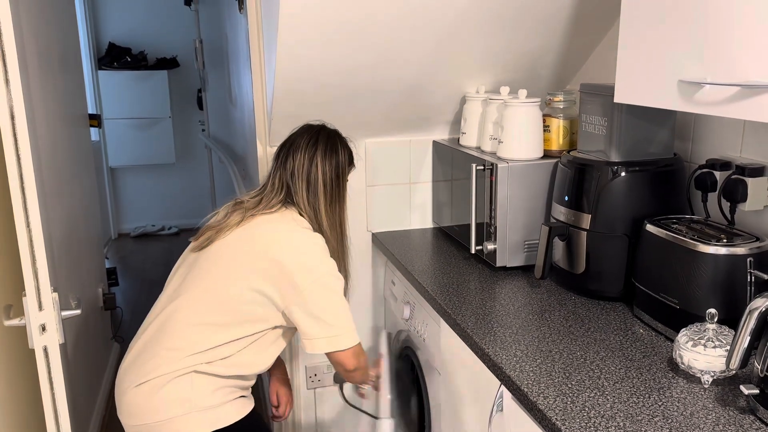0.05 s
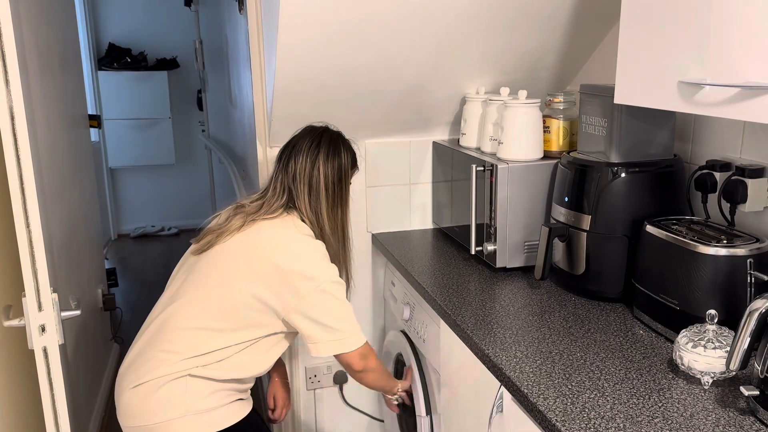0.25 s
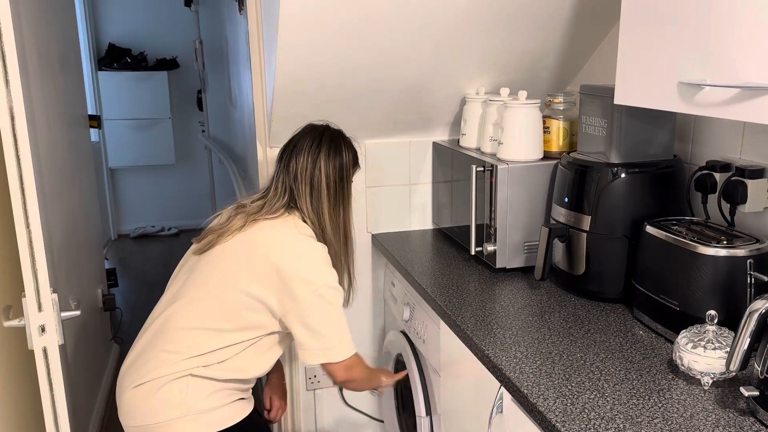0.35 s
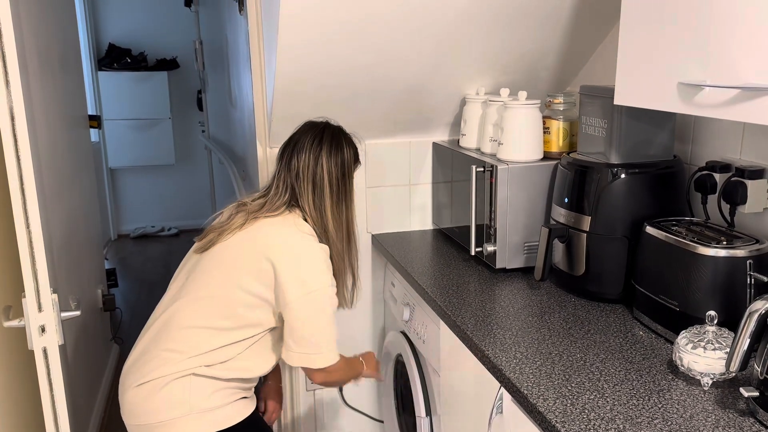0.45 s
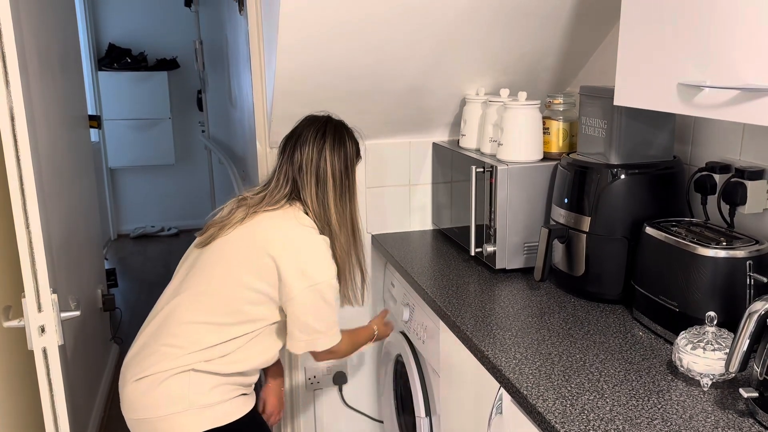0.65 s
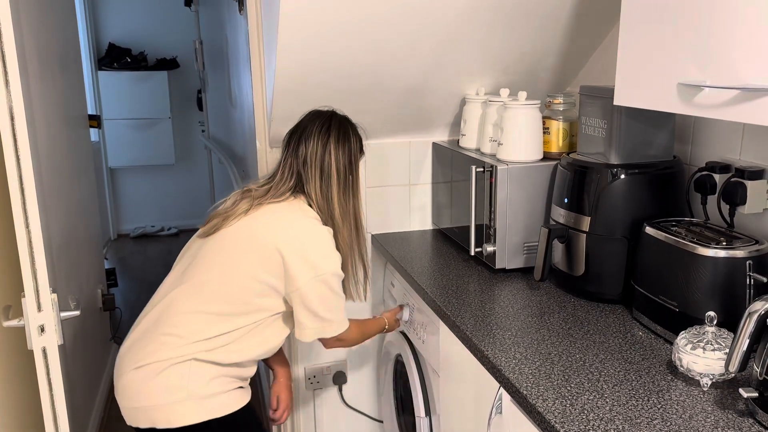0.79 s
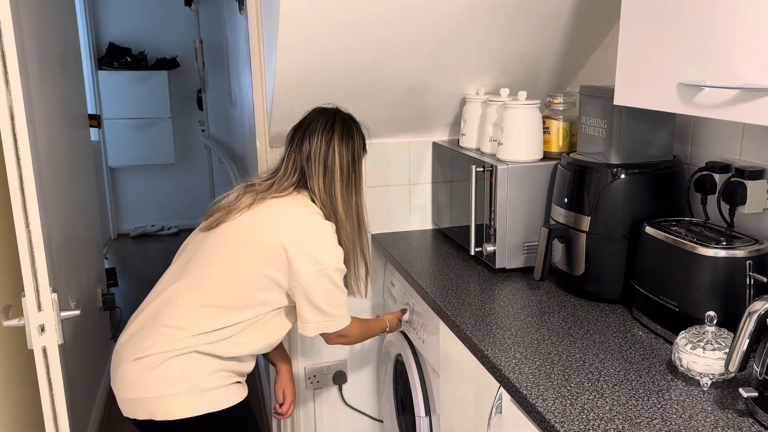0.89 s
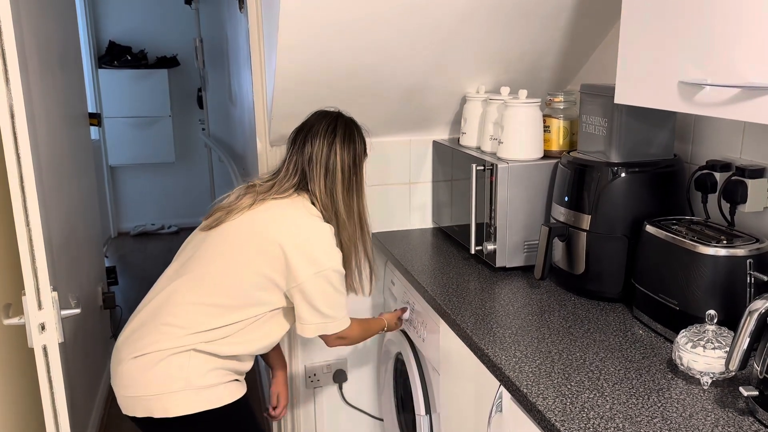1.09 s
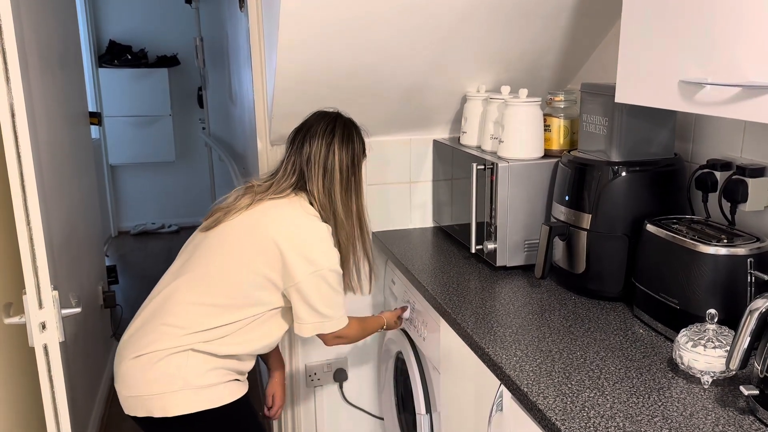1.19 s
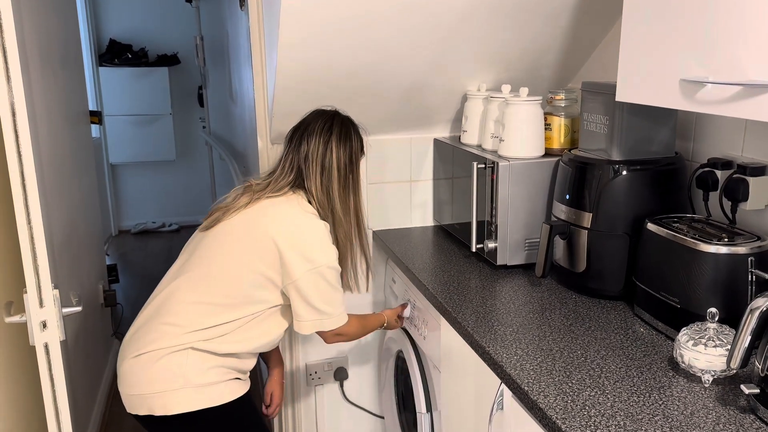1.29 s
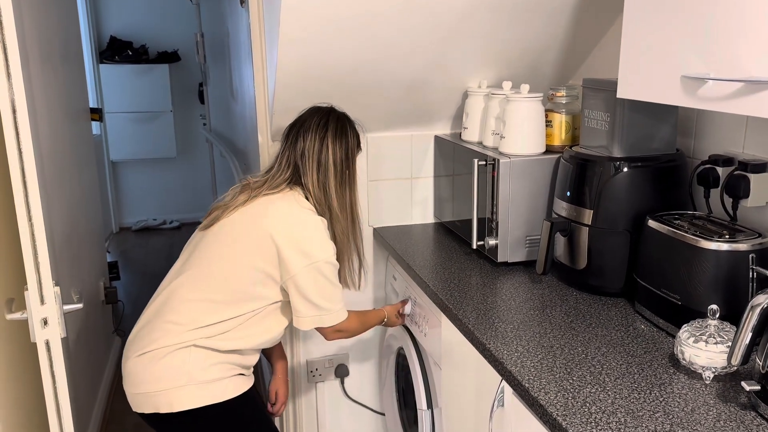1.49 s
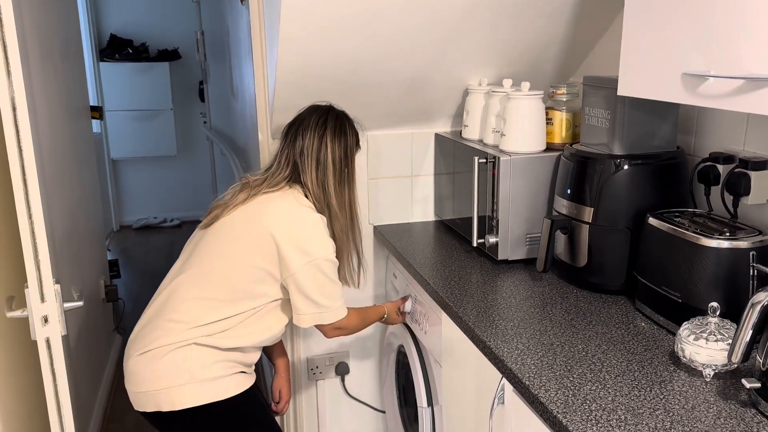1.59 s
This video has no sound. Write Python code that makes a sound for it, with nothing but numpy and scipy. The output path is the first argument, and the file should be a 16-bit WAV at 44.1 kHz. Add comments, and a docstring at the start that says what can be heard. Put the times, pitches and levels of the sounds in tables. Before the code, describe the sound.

A washing machine door slams shut with a loud hollow thud and sharp metallic latch click

```python
"""Washing machine door shut in a small kitchen

A two-port microphone hears a faint rattle, the hook sliding in, the door striking its frame and the latch snapping.
Strikes and snaps are coloured noise bursts; door, latch and panels add decaying sine modes.
The cabinet booms and the sprung drum rocks in low swelling tones while a diffuse noise tail makes the hard room.
Afterwards clothes rustle and a few soft bumps sound, over hiss, low rumble and a very faint ticking."""
import sys
import numpy as np
from scipy import signal
from scipy.fft import rfft, irfft, next_fast_len
from scipy.io import wavfile
from scipy.ndimage import uniform_filter1d

SR = 44100
rng = np.random.default_rng(int(sys.argv[2]) if len(sys.argv) > 2 else 0)


def file_out(sig):
    """Save sig as 16-bit WAV at sys.argv[1]."""
    # one column per channel
    cols = np.atleast_2d(sig).T
    # limit, then scale
    lim = np.clip(cols, -1, 1)
    pcm = np.round(lim * 32767).astype(np.int16)
    wavfile.write(sys.argv[1], SR, pcm)


N = 72765  # length in samples


def amp(db):
    """Decibels to linear gain."""
    return 10 ** (np.asarray(db) / 20)


def unit(x):
    """Scaled to rms 1."""
    return x / np.sqrt(np.mean(x ** 2) + 1e-20)


def along(points, hz):
    """A curve of (frequency_hz, value) points, read on a log frequency axis."""
    point_hz, value = np.transpose(points)
    return np.interp(np.log(hz + 1), np.log(point_hz + 1), value)


def since(start_s):
    """Seconds since start_s, zero before it."""
    return np.maximum(np.arange(N) / SR - start_s, 0)


def fade(t, t60):
    """Exponential decay, 60 dB down after t60 seconds."""
    return np.exp(-np.log(1000) * t / t60)


def envelope(start_s, rise, t60):
    """An exponential rise (time constant in s) at start_s, under an exponential decay."""
    t = since(start_s)
    return (1 - np.exp(-t / rise)) * fade(t, t60)


def sine(pitch_hz, t):
    """A sine of one pitch over the times t."""
    return np.sin(2 * np.pi * pitch_hz * t)


def filtered(x, response):
    """Sound whose spectrum is multiplied by a response of frequency, with padding against wrap-around."""
    size = next_fast_len(N + SR // 4)
    hz = np.fft.rfftfreq(size, 1 / SR)
    return irfft(rfft(x, size) * response(hz), size)[..., :N]


def noise(colour, alike):
    """Coloured stereo noise of rms 1, its left-right likeness set by the share of mid and side."""
    def mid_side(hz):
        angle = np.arccos(np.clip(along(alike, hz), -1, 1)) / 2
        return amp(along(colour, hz)) * np.array([np.cos(angle), np.sin(angle)])

    mid, side = filtered(rng.standard_normal((2, N)), mid_side)
    return unit(np.array([mid + side, mid - side]))


# low room noise over time: start_s, level_db (relative)
RUMBLE_LEVEL = [(0, 1), (0.079, -4), (.13, 2.5), (.5, 1.5), (1.0, 3.5), (1.25, -1), (1.471, 1),
                (1.53, -7.5), (1.65, 0)]
# spectrum of the low room noise: frequency_hz, density_db (relative, per Hz)
RUMBLE_COLOUR = [(20, 0), (60, 4), (110, 1.5), (230, -8), (330, -12), (430, -15.5), (580, -19), (720, -28),
                 (1200, -45), (4000, -47)]
# spectrum of the hiss: frequency_hz, density_db (relative, per Hz)
HISS_COLOUR = [(30, -18), (300, 0.5), (700, 2.5), (1050, -3.5), (1650, 5), (2500, 0), (5000, -7),
               (7500, -5), (10300, -3), (12000, -11.5), (16000, -5.5)]
# left-right likeness of the quiet sounds: frequency_hz, correlation (-1 to 1)
QUIET_ALIKE = [(60, 1), (300, 0.66), (1000, 0.27), (10000, 0.11)]


def background(rumble_db=-51, hiss_db=-57):
    """Room noise: steady coloured hiss over a low rumble of wavering level."""
    level_db = rumble_db + np.interp(since(0), *np.transpose(RUMBLE_LEVEL))
    rumble = amp(level_db) * noise(RUMBLE_COLOUR, QUIET_ALIKE)
    return rumble + amp(hiss_db) * noise(HISS_COLOUR, QUIET_ALIKE)


def ticking(level_db=-61, rate_hz=30, pitch_hz=7700, t60=0.036):
    """A very faint, high, regular ticking: one tone whose decay restarts at every tick."""
    t = since(0)
    return amp(level_db) * fade(t % (1 / rate_hz), t60) * sine(pitch_hz, t)


def swing(level_db=-55, rise=0.0027, t60=0.9):
    """The door gives a faint hollow rattle as it starts to swing: decaying noise with a peaked spectrum."""
    colour = [(100, -33), (280, 7), (520, -20), (720, 2), (1100, 8), (1700, -24), (6000, -27)]
    return amp(level_db) * envelope(0, rise, t60) * noise(colour, QUIET_ALIKE)


# left-right likeness of the direct sound: frequency_hz, correlation (-1 to 1)
DIRECT_ALIKE = [(200, 0.28), (1000, 0.52), (3000, 0.28), (8000, 0), (12000, 0.28)]


def hook(level_db=-27, swell_s=0.0094):
    """The hook scrapes up the catch, its friction noise growing exponentially until the door strikes."""
    lead = STRIKES[0][0] - np.arange(N) / SR  # seconds left before the first strike
    colour = [(60, 8), (300, -5.5), (1200, -2.5), (3000, -7), (7000, -14), (9000, -39)]
    swell = np.exp(-abs(lead) / swell_s) * (lead > 0)
    return amp(level_db) * noise(colour, DIRECT_ALIKE) * swell


# the drum rocking on its springs: start_s, level_db, pitch_hz, swell_s (time to the peak)
ROCKS = [(0.227, -12.5, 58.2, .036), (0.299, -6.5, 59.4, 0.039), (0.3654, -15.5, 57.9, 0.038),
         (.4480, -16.5, 59.2, 0.042), (0.513, -18.5, 56.6, 0.043), (0.657, -27.5, 58.5, 0.0361)]


def rocking(steepness=6):
    """The drum rocks on its springs and sets the cabinet booming in separate low swells."""
    out = 0
    for start_s, level_db, pitch_hz, swell_s in ROCKS:
        t = since(start_s)
        u = t / swell_s
        swell = (u * np.exp(1 - u)) ** steepness  # peaks at 1 when u is 1
        out = out + amp(level_db) * swell * sine(pitch_hz, t)
    return out


# the latch's steel parts: pitch_hz, level_db (relative), t60_s
LATCH_MODES = [(2025, 2, 0.028), (2370, -7.5, .04), (2910, -3, 0.031), (4170, -4.5, .03), (6570, 0, 0.045),
               (7300, -8, .03)]


def latch(start_s, snap_db, rise=0.00062, ring_db=-7.5):
    """The short steel ring of one latch contact: damped modes, each port in its own random phase."""
    out = 0
    for pitch_hz, level_db, t60 in LATCH_MODES:
        cycles = pitch_hz * since(start_s) + rng.random((2, 1))
        out = out + amp(ring_db + snap_db + level_db) * envelope(start_s, rise, t60) * np.sin(2 * np.pi * cycles)
    return out


def contacts(rows, colour, t60, rise):
    """Short dense bursts of coloured noise, one for each contact."""
    return [amp(level_db) * envelope(start_s, rise, t60) * noise(colour, DIRECT_ALIKE)
            for start_s, level_db in rows]


# the door's short, hollow knock: pitch_hz, level_db (relative), t60_s
KNOCK_MODES = [(542, -3.5, .085), (621, -3.5, 0.073), (919, -0.5, 0.066), (992, 0, 0.075), (1213, 1, 0.057),
               (1474, -13, 0.043), (1902, -13, 0.044)]


def knock(knock_db=-7.5, rise=0.003, lag_s=0.000061):
    """The door's heavily damped body modes, struck once; they reach the right port a little later."""
    strike_s = STRIKES[0][0]
    t = np.array([since(strike_s), since(strike_s + lag_s)])
    return sum(amp(knock_db + level_db) * envelope(strike_s, rise, t60) * sine(pitch_hz, t)
               for pitch_hz, level_db, t60 in KNOCK_MODES)


# how fast the kitchen dies away: frequency_hz, t60_s
ROOM_T60 = [(60, .9), (200, 0.58), (500, 0.68), (1000, 0.54), (2000, 0.48), (4000, 0.46), (7000, 0.37),
            (10000, 0.45), (15000, 0.25)]
# spectrum of the kitchen's answer: frequency_hz, level_db (relative)
ROOM_COLOUR = [(25, -5.5), (60, 5), (130, 12), (300, 12.5), (500, 0.5), (1000, 0), (2000, -2), (3200, 1.5),
               (5000, 1), (6800, 1), (8500, -6.5), (12000, -9), (16000, -11.5)]
# left-right likeness of the kitchen's answer: frequency_hz, correlation (-1 to 1)
ROOM_ALIKE = [(60, 0.69), (150, 0.77), (300, .7), (600, 0.15), (1200, -0.16), (4000, 0.14), (8000, -.1),
              (12000, 1)]


def kitchen(x, level_db=2.5, rise_s=0.022):
    """The hard room's diffuse tail: noise in which each frequency dies at its own speed, driven by x."""
    flat = noise([(20, 0), (20000, 0)], ROOM_ALIKE)
    hz, t, spectrum = signal.stft(flat, SR, nperseg=256)
    decay = fade(t, along(ROOM_T60, hz)[:, None])
    tail = signal.istft(spectrum * decay, SR, nperseg=256)[1][:, :N]
    tail = tail * (1 - np.exp(-since(0) / rise_s))
    tail = tail / np.linalg.norm(tail[0])  # left channel to unit energy, before colouring
    tail = filtered(tail, lambda f: amp(along(ROOM_COLOUR, f)))
    # the left channel alone drives both sides of the tail
    return amp(level_db) * signal.fftconvolve(x[:1], tail, axes=1)[:, :N]


# door meeting its frame: start_s, level_db
STRIKES = [(.2330, -9.5), (.2355, -9), (.2425, -13.5)]
# latch snapping home: start_s, level_db (before the direct gain)
SNAPS = [(0.231, -18.5), (0.2457, -15.5), (0.2485, -12.5), (0.2498, -13), (0.261, -24), (.2765, -24)]
# spectrum of the door contacts: frequency_hz, density_db (relative, per Hz)
STRIKE_COLOUR = [(60, -21.5), (300, -15), (560, -4.5), (780, -11.5), (980, -3), (1400, -5.5), (2000, -6),
                 (2800, -8), (4000, -14.5), (7000, -21), (10000, -24), (13500, -21.5), (16000, -27.5)]
# spectrum of the latch contacts: frequency_hz, density_db (relative, per Hz)
SNAP_COLOUR = [(100, -15), (600, -3.5), (1500, -3.5), (3000, -0.5), (5500, -1.5), (7000, 2), (8500, -4),
               (10500, -13), (13500, -8.5), (16000, -24)]


def door(knock_room_db=-12, snap_direct_db=1):
    """The door strikes and knocks and the latch snaps; the room answers every contact."""
    strikes = contacts(STRIKES, STRIKE_COLOUR, t60=0.048, rise=0.00041)
    cracks = contacts(SNAPS, SNAP_COLOUR, t60=0.038, rise=0.0007)
    snaps = [crack + latch(start_s, level_db) for crack, (start_s, level_db) in zip(cracks, SNAPS)]
    body = knock()
    direct = sum(strikes) + amp(snap_direct_db) * sum(snaps) + body
    room = sum(kitchen(blow) for blow in strikes + snaps) + amp(knock_room_db) * kitchen(body)
    return direct + room


# door, glass and panel ring: pitch_hz, level_db (relative), t60_s
DOOR_MODES = [(539, -3, 0.51), (567.7, -4, 0.73), (649.7, -1.5, 0.66), (705, -3, 0.61), (902, -1, 0.65),
              (978, 0, 0.56), (1048, 6.5, .45), (1228, -3, 0.51), (1633, -8, 0.85), (1980, -8, .45),
              (1992, 4.5, 0.24), (2784, 0.5, 0.5), (3110, -9, 0.41), (3190, -2.5, 0.34), (4840, -6, 0.3)]


def ring(ring_db=-26, rise=0.005, spread=0.24):
    """The door's long modes reach the two microphone ports slightly out of step (spread in cycles)."""
    strike_s = STRIKES[0][0]
    out = 0
    for pitch_hz, level_db, t60 in DOOR_MODES:
        phase = rng.random() + spread * rng.random((2, 1))
        wave = np.sin(2 * np.pi * (pitch_hz * since(strike_s) + phase))
        out = out + amp(ring_db + level_db) * envelope(strike_s, rise, t60) * wave
    return out


def drum(level_db=-27, rise=0.015, t60=0.61):
    """The steel drum shimmers: a narrow, high band of decaying noise stands for a dense cluster of modes."""
    colour = [(3000, -40), (6000, -17), (6400, 3), (6700, 0), (7050, -8), (7500, -19.5), (10000, -43)]
    return amp(level_db) * envelope(STRIKES[0][0], rise, t60) * noise(colour, DIRECT_ALIKE)


# the cabinet's sheet-steel panels: pitch_hz, level_db (relative), t60_s
PANEL_MODES = [(98.4, -10, 0.98), (116.2, -13.5, 1.33), (173.5, -2, .7), (189, -5.5, 0.86),
               (275.4, -3.5, 0.56), (332.6, -11, 0.45), (425, -18, .6)]


def cabinet(panel_db=-13.5, panel_rise=0.041, boom_db=-14.5, boom_hz=58.16, boom_rise=0.017, boom_t60=1.13):
    """The blow sets sheet-steel panel modes ringing above one long, low boom."""
    strike_s = STRIKES[0][0]
    t = since(strike_s)
    panels = sum(amp(panel_db + level_db) * envelope(strike_s, panel_rise, t60) * sine(pitch_hz, t)
                 for pitch_hz, level_db, t60 in PANEL_MODES)
    return panels + amp(boom_db) * envelope(strike_s, boom_rise, boom_t60) * sine(boom_hz, t)


def shudder(level_db=-29, rise=0.027, t60=1.17):
    """The machine's loose low shaking after the blow: slowly decaying low noise."""
    colour = [(20, -11), (35, -11), (55, -8), (95, -11), (140, 0.5), (220, -10.5), (450, -27), (700, -28),
              (1500, -69)]
    return amp(level_db) * noise(colour, ROOM_ALIKE) * envelope(STRIKES[0][0], rise, t60)


# clothes brushing: start_s, level_db, rise_s, t60_s
BRUSHES = [(0.691, -47, 0.0047, 0.19), (.713, -48, 0.0064, 0.31), (.757, -56.5, .008, 0.26),
           (.902, -49, .004, .15)]
# spectrum of the brushing: frequency_hz, density_db (relative, per Hz)
BRUSH_COLOUR = [(500, -26), (3000, -5), (7000, 9), (11000, 8), (14500, 12.5), (16000, 8)]
# rustle over time: start_s, level_db
RUSTLE_LEVEL = [(0, -59.5), (.55, -50), (.75, -50.5), (0.952, -54.5), (1.1, -49.5), (1.3, -55), (1.45, -69),
                (1.65, -61)]
# spectrum of the rustle: frequency_hz, density_db (relative, per Hz)
RUSTLE_COLOUR = [(100, -45), (430, 2), (570, -9.5), (700, -2.5), (1100, -4.5), (1520, 1), (1720, -1.5),
                 (1850, -3), (2800, -9), (3600, -10), (5000, -12.5), (10000, -20), (16000, -39.5)]


def clothes(grain_db=2.5):
    """Fabric brushes briefly in grainy noise, over a rustle of varying level as the arm moves on."""
    wander = unit(uniform_filter1d(rng.standard_normal(N), size=130))  # averaged over about 3 ms
    grain = amp(grain_db * wander)
    strokes = sum(amp(level_db) * envelope(start_s, rise, t60) for start_s, level_db, rise, t60 in BRUSHES)
    brush = strokes * noise(BRUSH_COLOUR, QUIET_ALIKE)
    level_db = np.interp(since(0), *np.transpose(RUSTLE_LEVEL))
    rustle = amp(level_db) * noise(RUSTLE_COLOUR, QUIET_ALIKE)
    return grain * brush + rustle


# soft bumps: start_s, level_db (of the whole bump), pitch_hz, t60_s
BUMPS = [(1.378, -43, 237.6, 0.29), (1.384, -46, 334, 0.13), (1.592, -43, 435, .4)]


def bumps(rise=0.0067, skirt_db=-14, thud_db=-3, tone_db=-1):
    """Dull, hollow bumps: a soft noise thud around one ringing mode."""
    out = 0
    for start_s, level_db, pitch_hz, t60 in BUMPS:
        colour = [(40, -12), (pitch_hz * 0.87, -4), (pitch_hz, 0), (pitch_hz * 1.43, skirt_db),
                  (2000, -24), (8000, -44)]
        thud = amp(thud_db) * noise(colour, QUIET_ALIKE)
        tone = amp(tone_db) * sine(pitch_hz, since(start_s))
        out = out + amp(level_db) * envelope(start_s, rise, t60) * (thud + tone)
    return out


# stereo balance of the machine: frequency_hz, left_minus_right_db
BALANCE = [(60, -1.5), (200, 1), (700, 0), (1300, -2), (2400, -3), (4400, -1), (8000, 1.5), (15000, -1)]


def scene():
    """All sources in the kitchen; the machine's left-right balance varies with frequency."""
    machine = swing() + hook() + rocking() + door() + ring() + drum() + cabinet() + shudder()
    halves = np.array([[0.5], [-0.5]])  # half the difference to each side
    machine = filtered(machine, lambda hz: amp(along(BALANCE, hz) * halves))
    return background() + ticking() + machine + clothes() + bumps()


def record(dry, top_hz=16200):
    """The loudest peaks are rounded off at full scale; nothing is kept from the band limit upward."""
    rounded = dry / (1 + np.abs(dry) ** 8) ** (1 / 8)
    return filtered(rounded, lambda hz: hz < top_hz)


dry = scene()
out = record(dry)
file_out(out)
```